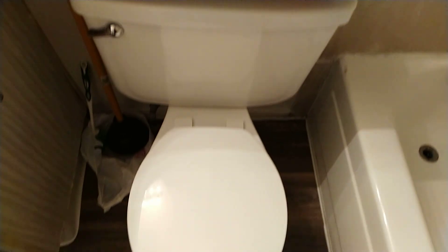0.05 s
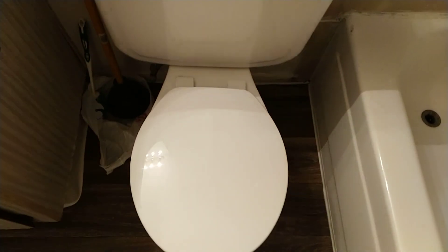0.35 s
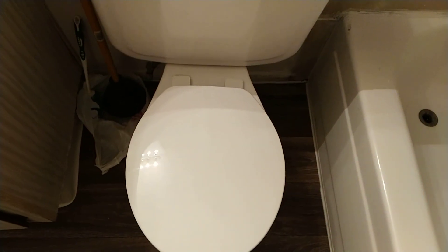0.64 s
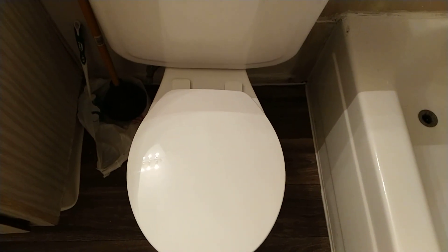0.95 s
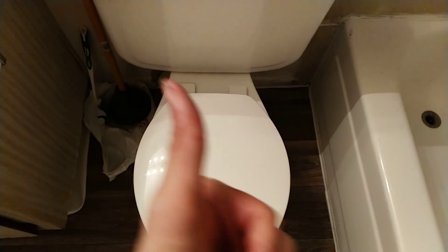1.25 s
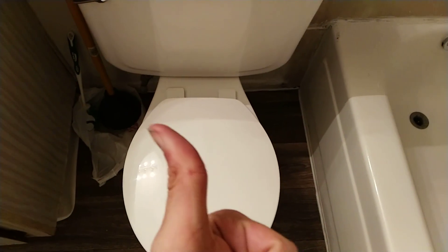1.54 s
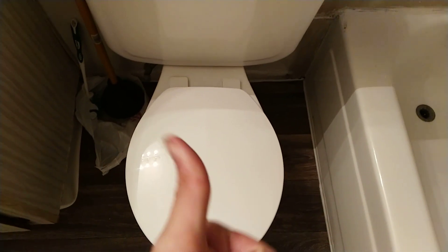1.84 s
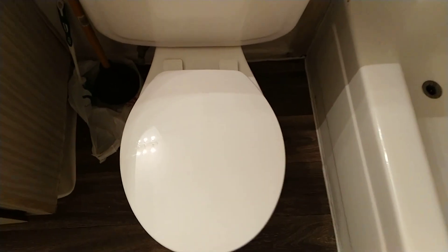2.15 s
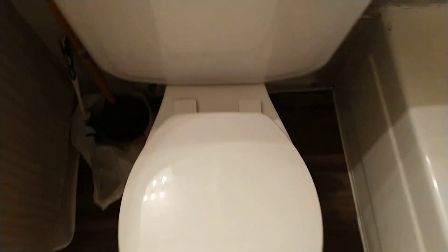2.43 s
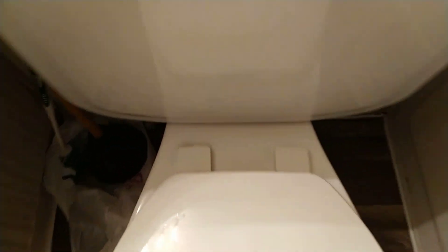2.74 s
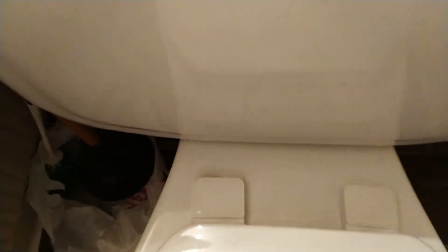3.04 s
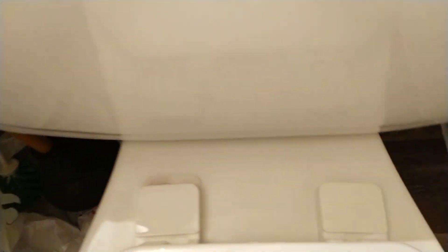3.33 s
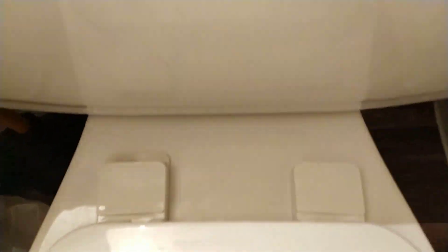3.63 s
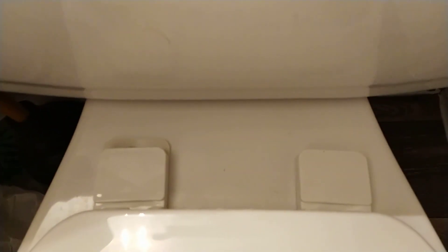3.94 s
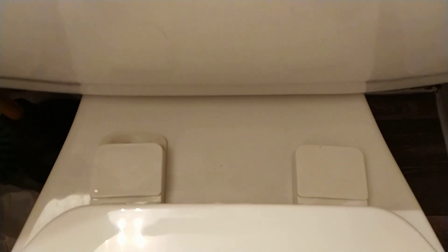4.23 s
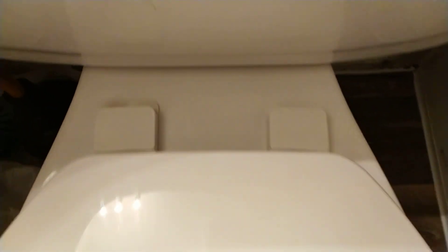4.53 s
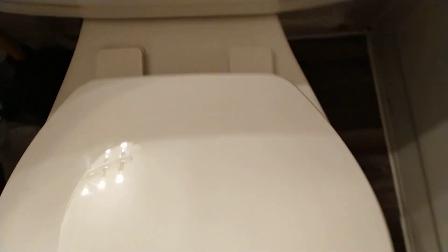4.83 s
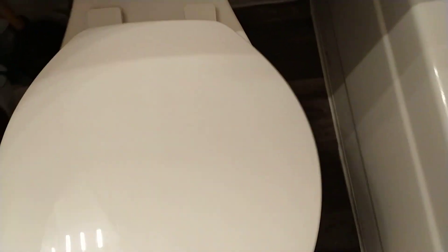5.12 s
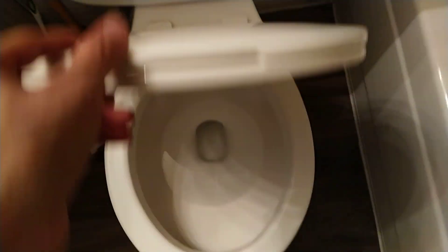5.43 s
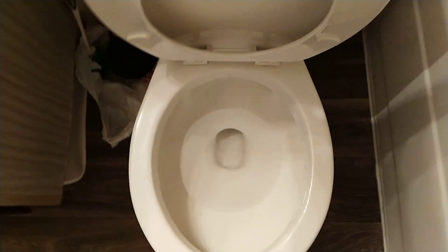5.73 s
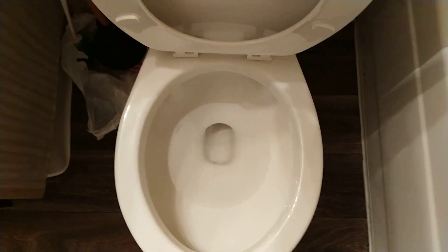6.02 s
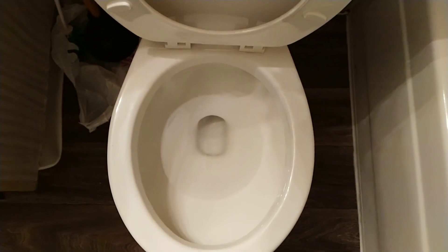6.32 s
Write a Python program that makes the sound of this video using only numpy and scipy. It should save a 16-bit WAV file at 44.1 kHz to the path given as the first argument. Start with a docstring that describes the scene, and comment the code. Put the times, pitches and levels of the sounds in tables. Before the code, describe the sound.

The low hum of an exhaust fan and a soft rush of air fade in and run throughout, in a small, quiet tiled bathroom. Handling makes two lighter pops right at the microphone at about 0.4 and 0.7 seconds, then three loud, sharp pops with a short low thump between 1.2 and 1.5 seconds. From about 2.3 to 3.3 seconds the hum swells as the microphone leans down, and it stays stronger for a while. Clothes rustle very faintly in brief strokes from 2 seconds on. At 4.6 seconds a toilet lid gives a soft, dull knock as it is lifted. Lid and seat rattle lightly at 4.8 seconds and clack together sharply at 4.9, ringing briefly in the room. The hum sinks back by 5.6 seconds, a faint tick from the lid follows, and the fan carries on quietly until the end, a little after 6 seconds.

```python
"""A small, quiet tiled bathroom, with an exhaust fan humming over a soft rush of air. Handling the camera makes
a few sharp pops right at the microphone. The hum swells as the camera leans down into a standing wave of the
room, and sinks as it straightens. Clothes rustle softly. The toilet lid and seat are lifted: they rattle
lightly and clack together, ringing into the room, and the raised lid touches the tank softly."""
import sys
import numpy as np
from scipy import signal
from scipy.fft import rfft, irfft
from scipy.io import wavfile

SR = 44100
rng = np.random.default_rng(int(sys.argv[2]) if len(sys.argv) > 2 else 0)


def to_wav(sig):
    """Store sig (one row per channel, or 1-D mono) as 16-bit WAV at the path in sys.argv[1].

    Samples outside -1..1 are clipped; the rate is SR.
    """
    pcm = np.clip(np.atleast_2d(sig), -1, 1) * 32767
    pcm = np.round(pcm).astype(np.int16)
    wavfile.write(sys.argv[1], SR, pcm.T)  # frames by channels


N = 285327
TIME = np.arange(N) / SR
CUTOFF_HZ = 14330


def from_db(db):
    """Decibels to gain."""
    return 10 ** (np.asarray(db) / 20)


def rms_one(x):
    """Scale to rms 1."""
    return x / np.sqrt(np.mean(x ** 2) + 1e-20)


def at_hz(points, hz):
    """Read a curve on a log-frequency axis."""
    table = np.array(points)
    return np.interp(np.log(hz), np.log(table[:, 0]), table[:, 1])


def drift(per_s):
    """Random wander, spread about 1."""
    knots = rng.standard_normal(2000)
    return np.interp(TIME * per_s, np.arange(len(knots)), knots)


def noise(colour, size=N):
    """Noise shaped by an EQ curve, rms 1."""
    hz = np.maximum(np.fft.rfftfreq(size, 1 / SR), 1)
    heard = (hz > 20) & (hz < CUTOFF_HZ)
    white = rfft(rng.standard_normal(size))
    return rms_one(irfft(white * from_db(at_hz(colour, hz)) * heard, size))


def tone(hz, waver):
    """A sine of rms 1 whose phase wavers slowly."""
    return np.sqrt(2) * np.sin(2 * np.pi * (hz * TIME + rng.random()) + waver * drift(2.93))


def low_pass(x, hz):
    """Gentle first-order low-pass."""
    return signal.sosfilt(signal.butter(1, hz, fs=SR, output="sos"), x)


def high_pass(x, hz, q):
    """Resonant second-order high-pass."""
    w = 2 * np.pi * hz
    return signal.lfilter(*signal.bilinear([1, 0, 0], [1, w / q, w * w], SR), x)


def resonance(x, hz, q):
    """A band-pass with unity gain at its peak."""
    return signal.lfilter(*signal.iirpeak(hz, q, fs=SR), x)


def decay(t, t60):
    """An envelope that loses 60 dB in t60 seconds."""
    return np.exp(-np.log(1000) * t / t60)


def ease(s, length):
    """A smooth step from 0 to 1, centred on time s."""
    return (1 + np.sin(np.pi * np.clip((TIME - s) / length, -.5, .5))) / 2


# the camera leans down, then straightens:
# (midpoint [s], length [s], hum change [dB], throb change [dB], motor tones change [dB])
CAMERA_MOVES = [(2.8, 1.05, 14.5, -8, 2.5), (5.1, 1, -11, 2, -4.5)]

def standing_waves():
    """Moving through the room's standing waves rides the fan's hum, throb and tones, in dB."""
    throb_lag_s, tones_lag_s = .72, .27   # the throb's wave is longer, so its change comes later
    hum_db, throb_db, tones_db = np.zeros((3, N))
    for s, length, hum_change, throb_change, tones_change in CAMERA_MOVES:
        hum_db += hum_change * ease(s, length)
        throb_db += throb_change * ease(s + throb_lag_s, length)
        tones_db += tones_change * ease(s + tones_lag_s, length)
    return hum_db, throb_db, tones_db


# faint tones of the motor and blades: (frequency [Hz], level [dB])
FAN_TONES = [(29.4, -60), (138.6, -65), (178, -69.5), (220.8, -66.5), (278, -77), (339, -73.5),
             (360.1, -67.5), (378.8, -68.5)]
# EQ of the air bed with the microphone's hiss: (frequency [Hz], relative level [dB])
AIR_EQ = [(25, -18), (45, -15), (90, -1), (150, -0.5), (230, -5), (330, -8), (500, -14), (1000, -18),
          (2000, -23.5), (4000, -26), (6000, -29), (8000, -35), (10500, -32), (14000, -26)]

def exhaust_fan():
    """The bed: mains hum, the motor's throb and wavering tones, and moving air."""
    hum_ride_db, throb_ride_db, tones_ride_db = standing_waves()
    hum_gain = from_db(-55.5 + hum_ride_db)
    hum = hum_gain * tone(hz=120.05, waver=.13)
    # where the hum is strong, the room's low modes also boom with the fan's turbulence
    boom = hum_gain * from_db(-17) * rms_one(resonance(noise(AIR_EQ), hz=85, q=6))
    throb = from_db(-57.5 + throb_ride_db) * tone(hz=59, waver=.26)
    tones = sum(from_db(db + 2 * drift(2.94)) * tone(hz, waver=.6) for hz, db in FAN_TONES)
    tones *= from_db(-3 + tones_ride_db)
    air = from_db(-59.5) * noise(AIR_EQ)
    return hum + boom + throb + tones + air


# soft strokes of clothing: (peak time [s], level [dB], half length [s], low-pass [Hz])
RUSTLES = [(2.148, -64, 0.062, 2000), (3.115, -60.5, 0.032, 4500), (3.934, -61.5, 0.011, 5000),
           (4.198, -61.5, 0.038, 5000), (4.291, -61, 0.0058, 5000), (4.693, -61.5, 0.029, 1200),
           (5.315, -65, 0.14, 2000), (5.672, -59.5, 0.022, 14300)]
# EQ of sliding cloth: (frequency [Hz], relative level [dB])
CLOTH_EQ = [(200, -14), (500, 5), (1300, 3), (3200, 1), (5000, -5), (8000, -8), (14000, 0)]

def clothes_rustle():
    """Cloth slides in brief bell-shaped swells, with an uneven grain."""
    friction = rms_one(noise(CLOTH_EQ) * from_db(4.2 * drift(140)))
    out = np.zeros(N)
    for s, db, half_s, top_hz in RUSTLES:
        swell = np.exp(-.5 * ((TIME - s) / half_s) ** 2)
        out += from_db(db) * swell * low_pass(friction, top_hz)
    return out


# pressure steps at the microphone: (time [s], height [relative], rise [ms], leak rate [1/s])
POPS = [(0.3529, -.036, 0.061, 500), (0.7098, 0.14, 0.047, 7.5), (1.1693, 0.2, 0.036, 4),
        (1.17887, 0.93, 0.088, 6), (1.36807, 0.49, 0.048, 27), (1.4596, 0.79, 0.029, 7)]

def handling_pops():
    """Each pressure step leaves the microphone's bass roll-off as a spike and a short low wobble."""
    snap_db, snap_power = -11, .71   # a taller step has a harder edge
    pressure, edge = np.zeros((2, N))
    for s, height, rise_ms, leak in POPS:
        since = TIME - s
        rise = (1 + np.tanh(since * 1000 / rise_ms)) / 2
        pressure += height * rise * np.exp(-leak * np.maximum(since, 0))
        edge += np.sign(height) * abs(height) ** snap_power * from_db(snap_db) * (since >= 0)
    case_knock = from_db(-7.5) * resonance(pressure, hz=1100, q=1.17)
    port_snap = resonance(edge, hz=13800, q=2.7)   # the edge rings the tiny microphone port
    pops = pressure + case_knock + port_snap
    pops += from_db(-25) * resonance(pops, hz=636, q=8.3)   # hollow ring of the camera's case
    wobbling = high_pass(pops, hz=54.2, q=2.43)
    return high_pass(wobbling, hz=75, q=.73)


# EQ of the tiled room's reverb: (frequency [Hz], relative level [dB])
ROOM_EQ = [(100, 2), (250, 4), (500, -11), (1100, 3), (2000, -3), (3200, -5.5), (5800, -11), (8000, -19),
           (11000, -24), (14000, -27)]
# its decay times: (frequency [Hz], t60 [s])
ROOM_T60 = [(100, 0.71), (260, 0.78), (700, 0.49), (1840, 0.32), (4850, 0.3), (12800, 0.18)]

def room_tail(t, build_s):
    """Reflections pile up within milliseconds and die sooner in the treble."""
    spectrum = rfft(noise(ROOM_EQ, size=len(t)))
    hz = np.fft.rfftfreq(len(t), 1 / SR)
    edges = np.geomspace(50, CUTOFF_HZ, 10)
    tail = np.zeros(len(t))
    for low, high in zip(edges, edges[1:]):
        band = irfft(spectrum * (hz >= low) * (hz < high), len(t))
        tail += band * decay(t, at_hz(ROOM_T60, np.sqrt(low * high)))
    return tail * (1 - np.exp(-t / build_s))


# body resonances of the lid and seat: (frequency [Hz], level [dB], t60 [s])
LID_MODES = [(79, -39, 0.29), (146.6, -29.5, 0.21), (225, -28.5, 0.23), (243, -28.5, 0.19),
             (263.5, -34.5, 0.176), (301, -35.5, .2), (384.3, -28.5, .22), (626, -45.5, 0.36),
             (767, -40, 0.18), (939, -31, 0.079), (1060, -30, 0.025), (1113, -29, 0.1), (1580, -43.5, 0.33),
             (1706, -42, 0.14), (2105, -41.5, 0.1), (2145, -37.5, 0.077), (2290, -50, 0.17),
             (3860, -70, 0.15), (4460, -52, .19), (5310, -34, 0.051), (5740, -43, 0.1), (5970, -56, 0.15)]

def lid_ring(t, attack_cycles, scatter_db):
    """Every hit strikes the modes a little differently; low modes take longer to bloom."""
    ring = np.zeros(len(t))
    for hz, db, t60 in LID_MODES:
        gain = from_db(db + scatter_db * rng.standard_normal())
        partial = np.sin(2 * np.pi * (hz * t + rng.random()))
        attack = 1 - np.exp(-t * hz / attack_cycles)
        ring += gain * partial * attack * decay(t, t60)
    return ring


# hits of lid and seat, and a last soft touch of the raised lid against the tank, each with its own loudness and
# brightness: (time [s], crack level [dB], ring level [dB], low-pass [Hz])
LID_HITS = [(4.5935, -26, -22, 880), (4.8364, -16.5, -18.5, 14000), (4.844, -18, -34, 6000),
            (4.8696, -15.5, -20, 10000), (4.9058, -2, -19, 15000), (4.9079, .5, 2.2, 4800),
            (5.6571, -27, -43, 12000)]
# EQ of the crack, from the lid's many dense modes: (frequency [Hz], relative level [dB])
CRACK_EQ = [(150, -13), (400, 2.5), (550, 1.5), (1000, -7), (1500, -5), (2000, -3.5), (3200, -10.5),
            (4500, -10.5), (5900, -8.5), (8000, -29), (11000, -28), (14000, -16)]

def lid_clacks():
    """Lid and seat knock together, and the raised lid touches the tank: each hit is a short crack, a ringing
    body and the room's tail."""
    out = np.zeros(N)
    t = np.arange(SR // 2) / SR
    for s, crack_db, ring_db, top_hz in LID_HITS:
        crack = from_db(-27) * noise(CRACK_EQ, size=len(t)) * decay(t, t60=.04)
        tail = from_db(-37) * room_tail(t, build_s=.0058)
        ring = lid_ring(t, attack_cycles=1.14, scatter_db=1.5)
        hit = from_db(crack_db) * (crack + tail) + from_db(ring_db) * ring
        start = round(s * SR)
        out[start:start + len(t)] += low_pass(hit, top_hz)
    return out


def scene():
    """Pops and clacks over the fan and clothes, in mono."""
    return (handling_pops() + lid_clacks() + exhaust_fan() + clothes_rustle())[None]


def record(dry):
    """The sound fades in, overloads on the hardest peaks and loses its very top."""
    open_s, full_s, ceiling = .085, .38, .9
    fade = (TIME >= open_s) * np.minimum(TIME / full_s, 1) ** 1.43
    top_cut = signal.ellip(10, .1, 70, CUTOFF_HZ, fs=SR, output="sos")
    return signal.sosfilt(top_cut, np.clip(dry * fade, -ceiling, ceiling))


dry = scene()
out = record(dry)
to_wav(out)
```